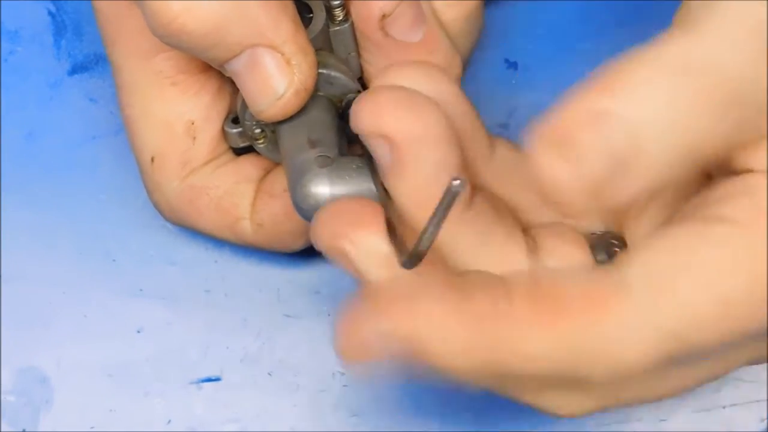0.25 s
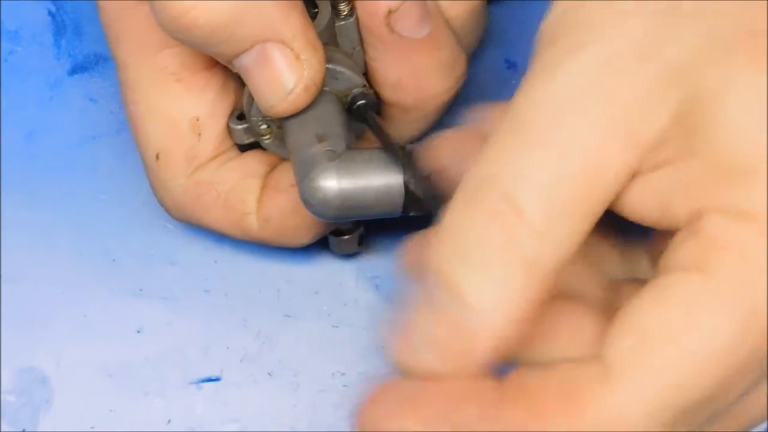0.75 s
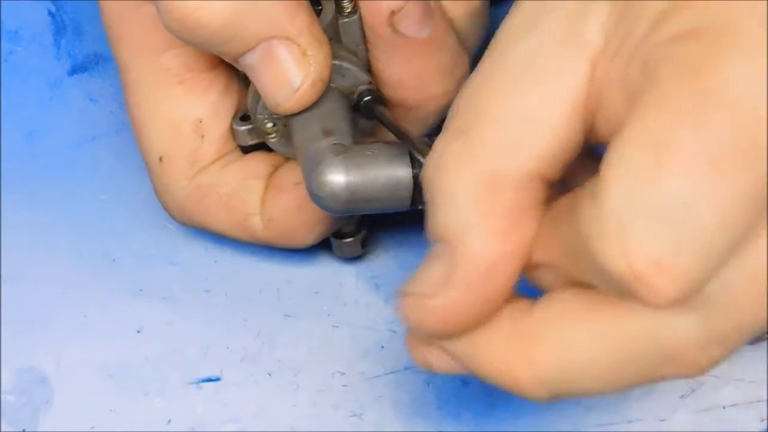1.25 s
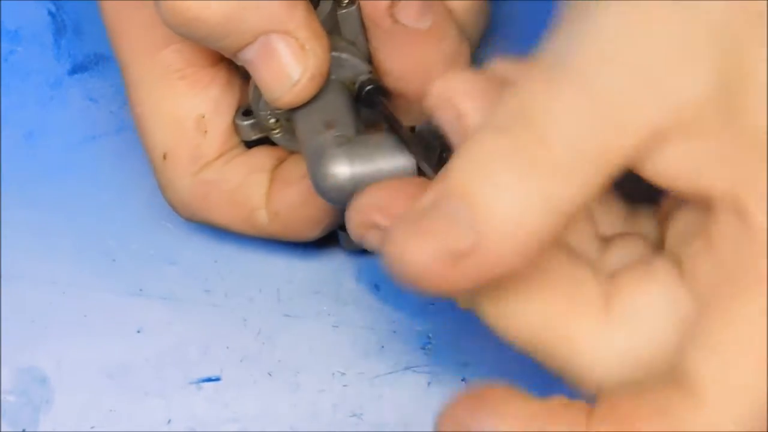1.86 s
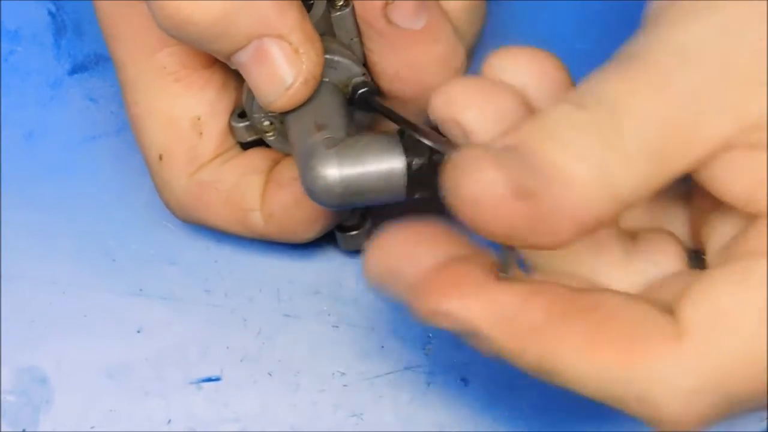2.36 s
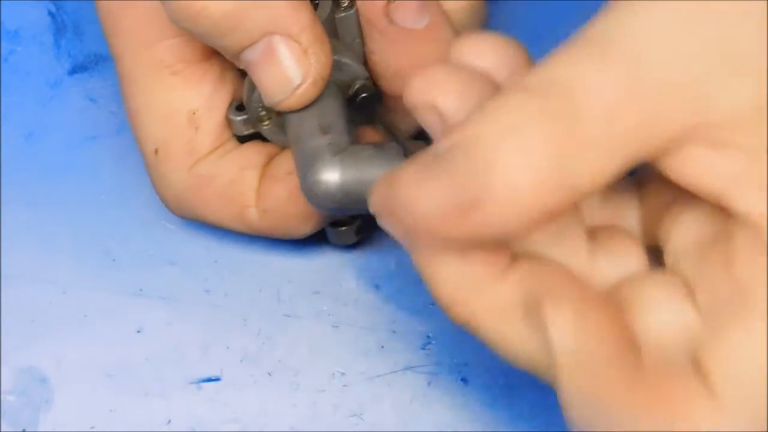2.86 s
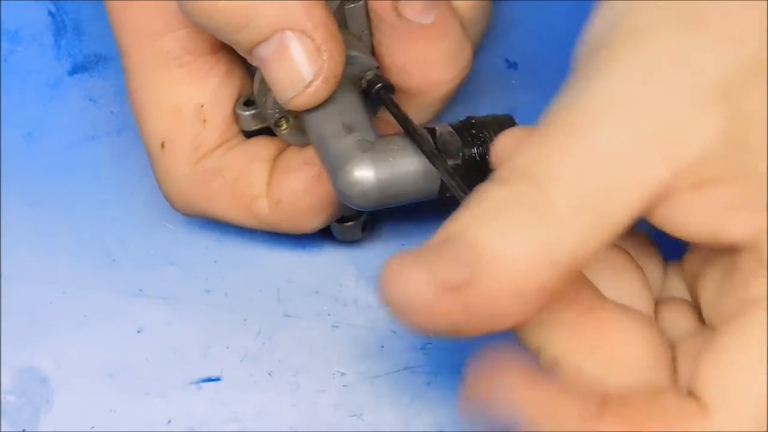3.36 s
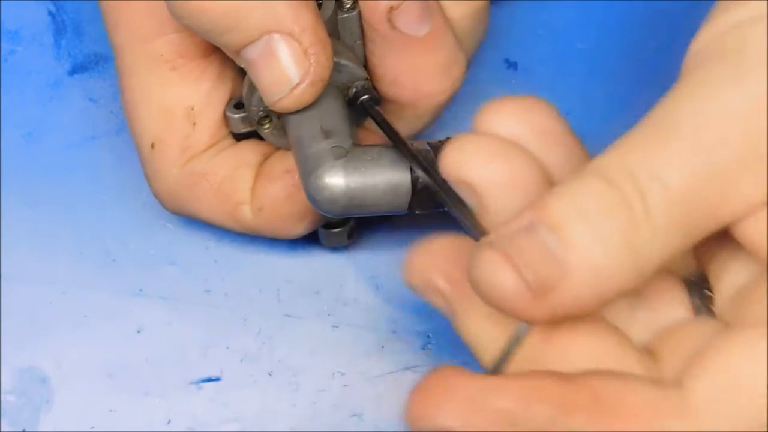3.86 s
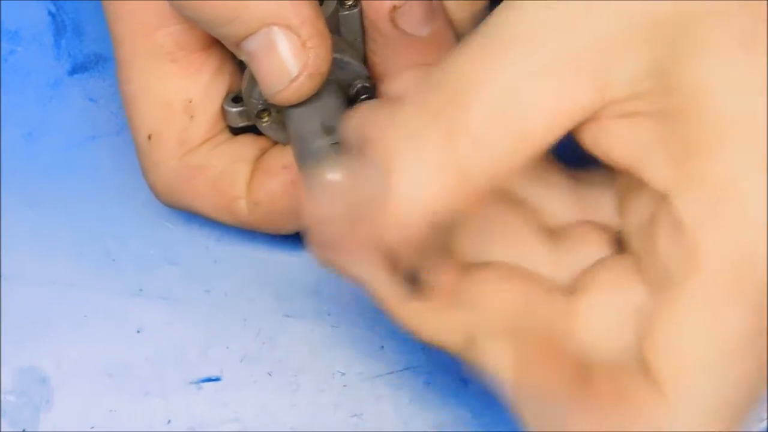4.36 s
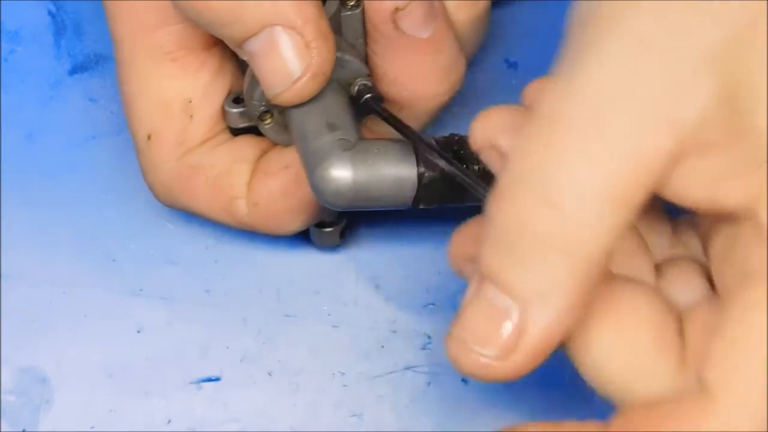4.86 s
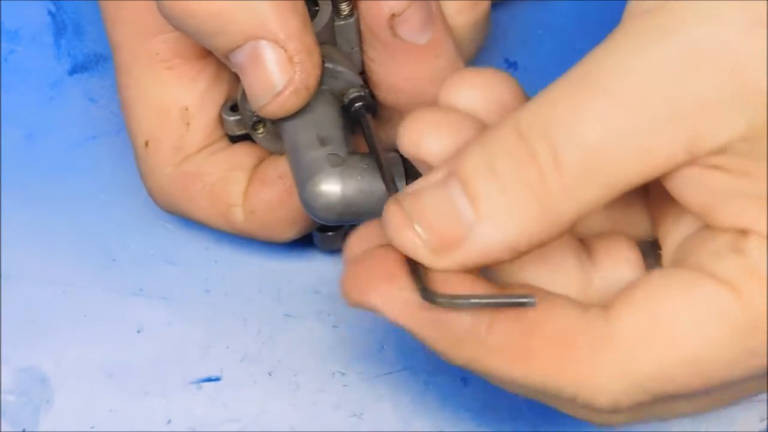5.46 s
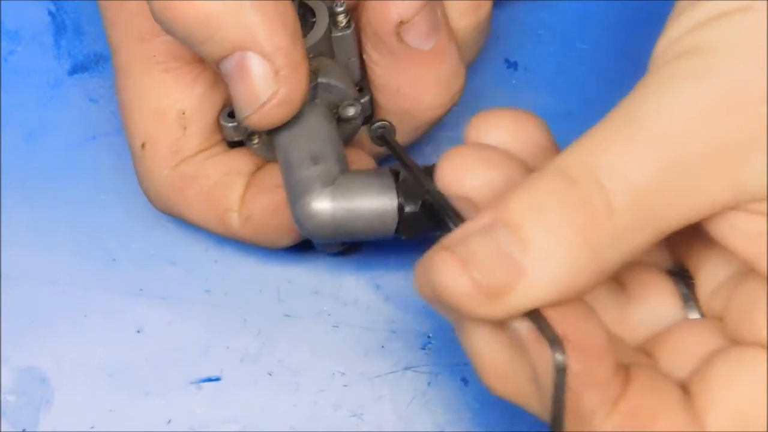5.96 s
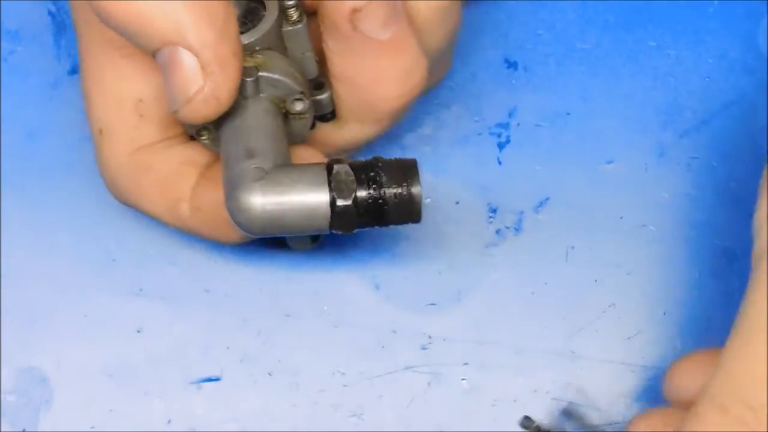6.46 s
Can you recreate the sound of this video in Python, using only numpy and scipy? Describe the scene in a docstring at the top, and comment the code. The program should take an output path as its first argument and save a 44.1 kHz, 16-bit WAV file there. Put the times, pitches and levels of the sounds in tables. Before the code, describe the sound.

A steady bright ultrasonic cleaner hiss with a sizzling edge and hollow rush; faint soft hand bumps, one tiny tick, then a small clatter at the end.

```python
"""A steady hiss comes first: cavitation in an ultrasonic cleaner, noise bursts modulated by the mains ripple.
The tank's resonances colour it; a surging sizzle, the casing's rush and a buzz of ripple harmonics go with it.
Close by, hands turn a hex key in a small metal part: soft bumps and rubbing (enveloped low noise),
and one tick with a faint second (decaying modes), then a short drag.
Near the end a small object is put down on the bench: struck modes, a skid and the bench's answer."""
import sys
import numpy as np
from scipy import signal
from scipy.fft import rfft, irfft
from scipy.io import wavfile
from scipy.ndimage import uniform_filter1d

SR = 44100
rng = np.random.default_rng(int(sys.argv[2]) if len(sys.argv) > 2 else 0)


def store_wav(level_fs):
    """Save 16-bit WAV to argv[1]."""
    pcm = np.round(np.clip(np.atleast_2d(level_fs), -1, 1) * 32767)
    wavfile.write(sys.argv[1], SR, pcm.T.astype(np.int16))


N = 296660
T = np.arange(N) / SR
FREQS = np.maximum(np.arange(N // 2 + 1) * SR / N, 1)
RIPPLE_HZ = 119.96  # rectified mains: two crests in each mains cycle


def undb(db):
    """Logarithmic level: decibels to amplitude gain."""
    return 10 ** (np.asarray(db) / 20)


def unit(x):
    """Normalisation: scale to rms 1."""
    return x / np.sqrt(np.mean(x ** 2))


def curve(rows):
    """Linear interpolation in time between (start_s, value) rows."""
    return np.interp(T, *np.transpose(rows))


def colour(points):
    """Spectral envelope: gain from (pitch_hz, level_db) points, joined on a logarithmic pitch axis."""
    hz, db = np.transpose(points)
    return undb(np.interp(np.log(FREQS), np.log(hz), db))


def resonance(hz, width):
    """Damped oscillator: complex response with gain 1 at its centre."""
    return 1 / (1 + 1j * hz / width * (FREQS / hz - hz / FREQS))


def humps(modes):
    """Power sum of steep (squared) resonances, from (pitch_hz, width_hz, level_db) rows."""
    power = 0
    for hz, width, db in modes:
        power = power + np.abs(undb(db) * resonance(hz, width) ** 2) ** 2
    return np.sqrt(power)


def shape(x, response):
    """Linear filtering in the frequency domain; the result has rms 1."""
    return unit(irfft(rfft(x) * response, N))


def walk(rate):
    """Low-passed noise: smooth random wandering with rms 1 and a Gaussian roll-off at rate (Hz)."""
    return shape(rng.standard_normal(N), np.exp(-(FREQS / rate) ** 2))


def swell(middle, length):
    """Gaussian envelope: one soft push, length (s) between its 1/e points."""
    return np.exp(-(2 * (T - middle) / length) ** 2)


def pan(left_db):
    """Interchannel level difference: two gains for a left-minus-right level."""
    return undb(np.array([[left_db], [-left_db]]) / 2)


def delay(x, start):
    """Time shift: let a sound begin at a given time."""
    return np.pad(x, (int(start * SR), 0))[:N]


def stereo_noise(likeness, fade_hz):
    """Diffuse-field coherence: noise alike in the bass of both channels, unrelated well above fade_hz."""
    alike = np.clip(likeness, 0, .98) * np.exp(-(FREQS / fade_hz) ** 2)
    mid, side = rfft(rng.standard_normal((2, N)))
    sign = np.array([[1], [-1]])
    return irfft(mid * np.sqrt(1 + alike) + side * np.sqrt(1 - alike) * sign, N)


def reflect(x, t60, wet_db):
    """Reverberation: dense reflections from bench and walls, unrelated in the two channels."""
    tail = rng.standard_normal((2, N)) * undb(-60 * T / t60)
    tail /= np.sqrt(np.sum(tail ** 2, axis=1, keepdims=True))
    return x + undb(wet_db) * irfft(rfft(x) * rfft(tail), N)


def ring(modes):
    """Modal decay: damped sines of a struck object, from (pitch_hz, level_db, t60_s) rows."""
    out = 0
    for hz, db, t60 in modes:
        decay = np.exp(-np.log(1000) * T / t60)
        out = out + undb(db) * np.sin(2 * np.pi * hz * T) * decay
    return out


def uneven_noise(scatter_db):
    """Impulsive noise: dense random samples whose level has an exponentially distributed excess."""
    return rng.standard_normal((2, N)) * undb(scatter_db * rng.exponential(size=(2, N)))


def scrape(hz, width, scatter_db):
    """Stick-slip friction: dense tiny clicks of uneven size through a broad resonance."""
    return shape(uneven_noise(scatter_db), resonance(hz, width) ** 2)


# spectral envelope of the machine's rush: pitch_hz [Hz], level_db [relative dB]
RUSH = [(20, -80), (60, -56), (105, -44), (145, -23), (172, -25), (220, -12), (300, -14), (365, -8),
        (435, -8), (495, -2.5), (640, 2), (890, -1.5), (1200, -1), (1370, -2.5), (1650, -2.5), (2100, -4),
        (3300, -16.5), (6000, -45)]
# hollow casing resonances: pitch_hz [Hz], width_hz [Hz, before squaring], level_db [dB re the rush]
CASING_MODES = [(530, 50, -3), (770, 50, -3), (840, 30, -3), (1040, 40, -3), (1120, 40, -3), (1285, 70, -1),
                (1700, 160, -4)]


def rush():
    """Resonant coloration: the bath and cooling air rush through the casing, with a fan's wavering note."""
    casing = np.hypot(1, humps(CASING_MODES))
    air = shape(stereo_noise(likeness=0.58, fade_hz=2450), colour(RUSH) * casing)
    air = air * undb(-44.5 + 1.1 * walk(21))
    # a narrow band of noise wavers like an unsteady tone
    fan = shape(stereo_noise(likeness=.98, fade_hz=3000), resonance(630, 28) ** 2) * undb(-60.5)
    return air + fan


# ripple harmonics in the casing: multiple [of RIPPLE_HZ], level_db [rms dB before waver], left_db [L-R dB]
BUZZ = [(3, -77, 7), (4, -63, 2.5), (6, -64, -1), (7, -72, 8), (8, -66, 2), (10, -61.5, -1), (11, -65.5, 8),
        (14, -67, 2), (17, -66, -8), (20, -69, -6)]


def buzz():
    """Harmonic series: ripple multiples drift in level and phase, with a phase offset between channels."""
    out = 0
    for multiple, db, left_db in BUZZ:
        phase = rng.uniform(0, 2 * np.pi) + 0.19 * rng.standard_normal((2, 1)) + 0.53 * walk(1.3)
        tone = np.sin(2 * np.pi * multiple * RIPPLE_HZ * T + phase)
        out = out + undb(db + 1.6 * walk(3.1)) * pan(left_db) * tone
    return np.sqrt(2) * out  # rms to peak amplitude of a sine


# shoves of the working hands: middle_s [s], length_s [s], level_db [dB at the middle, before panning]
BUMPS = [(0.082, 0.19, -72), (.3, 0.23, -67), (0.542, .06, -76), (.9, 0.042, -81), (0.992, 0.068, -78),
         (1.334, .18, -80), (1.6, 0.19, -65), (1.82, 0.23, -69), (1.947, 0.06, -72), (2.196, 0.12, -74),
         (2.318, .07, -78), (2.516, 0.097, -75), (2.693, .05, -77), (2.8, .04, -73), (2.89, .07, -76),
         (3.163, .05, -75), (3.26, 0.066, -77), (3.41, .07, -74), (3.71, 0.21, -69), (3.895, 0.045, -77),
         (4.237, 0.16, -71), (4.51, 0.11, -72), (4.666, 0.079, -72), (4.81, .05, -79), (5.093, .08, -70),
         (5.238, .07, -70), (5.44, .1, -74), (5.54, 0.06, -67), (5.677, .13, -65), (5.87, .07, -76),
         (6.06, .05, -75), (6.197, 0.11, -69), (6.438, .06, -74), (6.65, 0.11, -67)]
# spells of twirling the key: start_s [s], end_s [s], level_db [rubbing dB before its variation]
TWIRLS = [(0.0, .45, -83), (1.5, 2.9, -87.5), (4.15, 6.3, -82)]
# spectral envelope of the hands on the bench: pitch_hz [Hz], level_db [relative dB]
HAND_RUMBLE = [(20, -7), (45, -11), (75, 6), (110, 1.5), (160, 4), (230, -18), (500, -39)]


def hands():
    """Amplitude modulation: low noise swells with each bump and varies unevenly as the fingers rub."""
    push = sum(undb(db) * swell(middle, length) for middle, length, db in BUMPS)
    twirl = sum(undb(db) * ((T > start) & (T < end)) for start, end, db in TWIRLS)
    # the averaging fades each spell in and out over about 90 ms
    rub = uniform_filter1d(twirl, size=4000) * undb(5 * walk(7.7))
    rumble = shape(stereo_noise(likeness=0.48, fade_hz=600), colour(HAND_RUMBLE))
    return rumble * np.hypot(push, rub) * pan(5.5)


# slips of the key in the screw head: start_s [s], level_db [dB of the ring]
KEY_TICKS = [(3.346, -29), (3.379, -45)]
# ring of the key: pitch_hz [Hz], level_db [relative dB], t60_s [s]
KEY_MODES = [(2240, -3, .013), (2363, 0, .024), (2385, -23, .18), (2700, -4, .012), (2890, -7, .012)]


def key_ticks():
    """Modal excitation by a soft push: the key rings with a 0.4 ms rise rather than a sharp edge."""
    key = ring(KEY_MODES) * (1 - np.exp(-T / .0004))
    return sum(undb(db) * delay(key, start) for start, db in KEY_TICKS) * pan(-3.5)


def key_drag():
    """Decaying friction: the key drags on briefly after its first slip."""
    fade = delay(undb(-48) * np.exp(-T / .045), KEY_TICKS[0][0])
    return fade * scrape(2400, 480, scatter_db=3)


# contacts on the bench: start_s [s], level_db [dB of the ring], bench_db [dB of the bench's answer]
CLATTER = [(6.4875, -19.0, -44), (6.4884, -21, -48), (6.4912, -31, -39.5), (6.4975, -29, -44),
           (6.5078, -21, -43), (6.5262, -22.5, -49), (6.5273, -27, -52), (6.5545, -30, -58),
           (6.5593, -19.5, -43), (6.5632, -27, -44), (6.5715, -30, -48)]
# ring of the object put down: pitch_hz [Hz], level_db [relative dB before spot changes], t60_s [s]
OBJECT_MODES = [(1780, -25, .04), (2850, -13, 0.006), (3230, -4, 0.007), (3730, -7, 0.008),
                (4570, -11, 0.009), (4850, -11, 0.007)]


def object_contacts():
    """Modal weighting by point of impact: each bounce falls on another spot and changes the mode levels."""
    spots = rng.standard_normal((len(CLATTER), len(OBJECT_MODES))) * 1.5  # dB
    rise = 1 - np.exp(-T / .00015)
    out = 0
    for (start, db, _), spot in zip(CLATTER, spots):
        modes = [(hz, mode_db + change, t60) for (hz, mode_db, t60), change in zip(OBJECT_MODES, spot)]
        out = out + undb(db) * delay(ring(modes) * rise, start)
    return out


def object_skid():
    """Sliding friction: the object skids all the way between its bounces, then comes to rest."""
    start_s, attack_s, end_s, release_s = 6.475, .015, 6.572, .018
    attack = np.clip((T - start_s) / attack_s, 0, 1)
    release = np.exp(-np.maximum(T - end_s, 0) / release_s)
    level = undb(-41.3 + 1.5 * walk(300))
    return level * attack * release * scrape(3700, 4400, scatter_db=2.5)


# spectral envelope of the bench top's answer: pitch_hz [Hz], level_db [relative dB]
BENCH = [(40, -47), (220, -18), (550, 1), (1050, -2), (1750, 6), (2500, 1), (3600, -5), (5000, -7),
         (7000, -17), (12000, -30)]


def bench_answer():
    """Forced response of a damped plate: each contact starts a decaying noise, added by power."""
    fade = np.exp(-T / .028)
    shake = np.sqrt(sum(delay(undb(db) * fade, start) ** 2 for start, _, db in CLATTER))
    shake = shake * undb(1.5 * walk(180))
    return shake * shape(stereo_noise(likeness=0.6, fade_hz=6000), colour(BENCH))


def small_knocks():
    """Radiation efficiency: small objects give no bass and the mat dulls their top, before reflections."""
    band = signal.butter(3, [1400, 5800], "band", fs=SR, output="sos")
    direct = signal.sosfilt(band, key_ticks() + object_contacts() + object_skid())
    return reflect(direct, t60=.25, wet_db=-8) + bench_answer() + key_drag()


def collapses(depth):
    """Cavitation noise: bubble collapses of uneven size, stronger on each crest of the rectified mains."""
    crest_s = 0.0067
    return uneven_noise(2) * (1 + depth * np.cos(2 * np.pi * RIPPLE_HZ * (T - crest_s)))


# spectral envelope of the collapsing bubbles: pitch_hz [Hz], level_db [relative dB]
HISS = [(100, -46), (1500, -21.5), (3000, -2.5), (4100, -5), (4680, -6), (5200, -2), (6000, -1), (7100, -1),
        (7400, 2), (9200, 3.5), (9800, 2), (10500, 3.5), (12500, 5), (15800, 8), (17000, -18)]
# tank resonances rung by the hiss: pitch_hz [Hz], width_hz [Hz], level_db [dB re the hiss]
TANK_MODES = [(2070, 60, 8), (2420, 140, 5), (2700, 70, 4), (3460, 130, 5), (4250, 80, 5), (4540, 50, 5),
              (4850, 70, 6), (5200, 70, 1), (6240, 90, 1), (6380, 60, -1), (6950, 110, 1), (7250, 45, 1),
              (11490, 60, -4), (14610, 80, -6)]


def tank_hiss(drive_db):
    """Source and resonator: broad cavitation noise rings the tank's narrow modes."""
    mode_power = sum(np.abs(undb(db) * resonance(hz, width)) ** 2 for hz, width, db in TANK_MODES)
    hiss = shape(collapses(depth=.095), colour(HISS) * np.sqrt(1 + mode_power))
    hiss = hiss * undb(drive_db + 3.0 + 0.5 * walk(17)) * pan(2.64)
    return reflect(hiss, t60=.16, wet_db=-6)


def top_band(drive_db):
    """Band-limited noise: a bright band of collapses around 15.6 kHz."""
    band = shape(collapses(depth=.055), resonance(15560, 1350) ** 2)
    return band * undb(drive_db + 2.8 + .4 * walk(50)) * pan(5.6)


# slow swell of the sizzle near 8 kHz: start_s [s], level_db [dB before surges, flutter and flicker]
SIZZLE_LEVEL = [(0.0, -45), (0.25, -47), (0.8, -46), (1.0, -50.5), (1.14, -42.5), (1.7, -43.5),
                (2.1, -48.5), (2.58, -47), (2.68, -45.5), (3.45, -46), (3.75, -46), (4.5, -45.5),
                (5.3, -46), (5.9, -48.5), (6.72, -46)]
# brief surges of the sizzle: middle_s [s], level_db [dB over the swell]
SURGES = [(.22, 3), (1.2, 2.5), (3.29, 3.5), (3.57, 5.5), (5.44, 4), (5.99, 3.5), (6.13, 4), (6.27, 4),
          (6.42, 6), (6.58, 2.5)]
# bubble cloud resonances: pitch_hz [Hz], width_hz [Hz, before squaring], level_db [relative dB]
SIZZLE_MODES = [(7720, 110, -.5), (8030, 130, -1), (8180, 260, -3), (8380, 160, 0), (8780, 200, -2),
                (8250, 1500, -4)]


def sizzle():
    """Collective bubble resonance: the cloud's own modes swell, surge, throb lightly and flicker."""
    surge_db = curve(SIZZLE_LEVEL) + sum(db * swell(middle, .08) for middle, db in SURGES)
    # noise in a narrow band around 6.8 Hz gives the irregular throb
    flutter = shape(rng.standard_normal(N), resonance(6.8, 3) ** 2)
    level_db = surge_db + .7 * flutter + 1.4 * walk(60)
    return shape(collapses(depth=0.027), humps(SIZZLE_MODES)) * undb(level_db) * pan(2.5)


# slow changes of cavitation strength: start_s [s], level_db [dB, before each band's own offset]
DRIVE = [(0.0, -40.5), (0.58, -40.5), (1.45, -40), (1.7, -40.5), (6.7, -40)]


def cavitation():
    """Common drive: hiss and top band follow one slow strength curve; the sizzle has its own."""
    drive_db = curve(DRIVE)
    return tank_hiss(drive_db) + top_band(drive_db) + sizzle()


def scene():
    """Superposition: the cleaner's sounds and the handwork add linearly."""
    return rush() + buzz() + hands() + small_knocks() + cavitation()


def record(dry):
    """Band limiting: the recorder's elliptic low-pass cuts steeply above 15.73 kHz."""
    low_pass = signal.ellip(14, .1, 90, 15730, fs=SR, output="sos")
    return signal.sosfilt(low_pass, dry)


dry = scene()
out = record(dry)
store_wav(out)
```